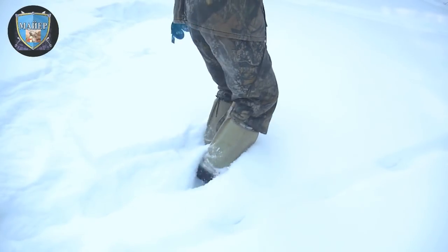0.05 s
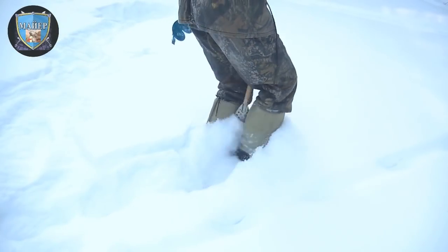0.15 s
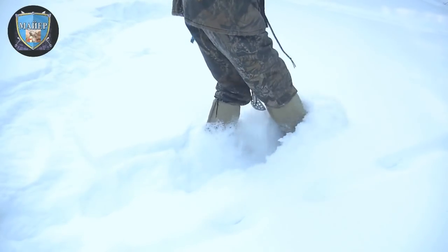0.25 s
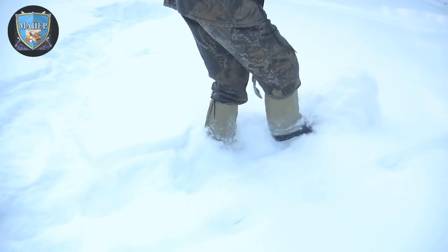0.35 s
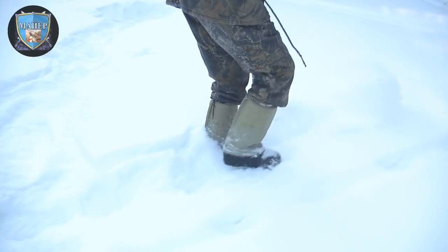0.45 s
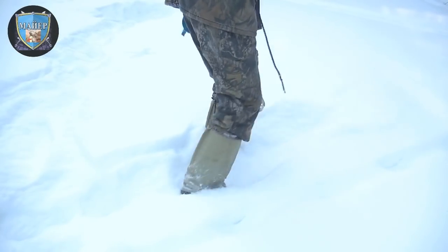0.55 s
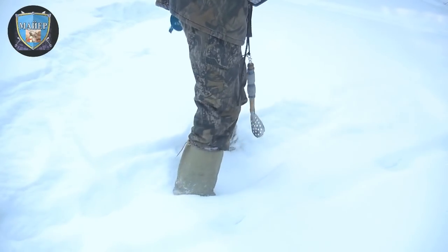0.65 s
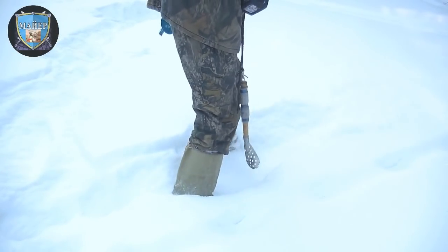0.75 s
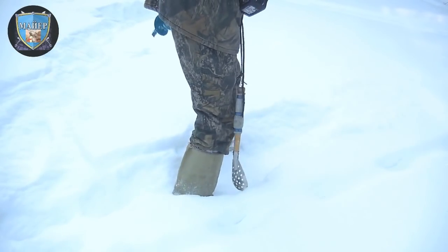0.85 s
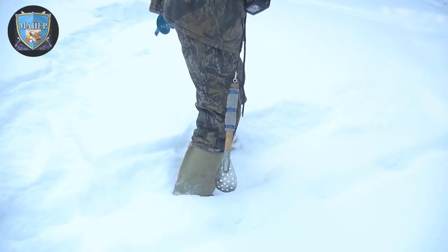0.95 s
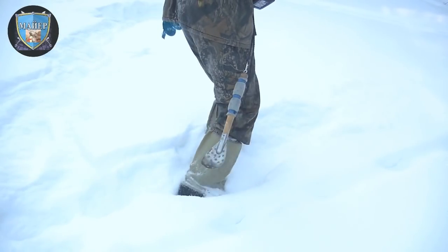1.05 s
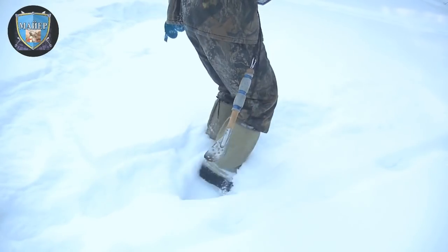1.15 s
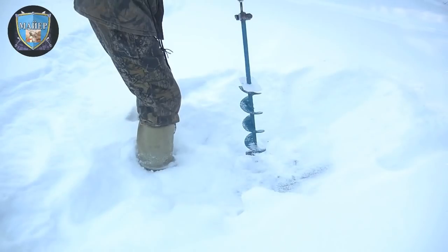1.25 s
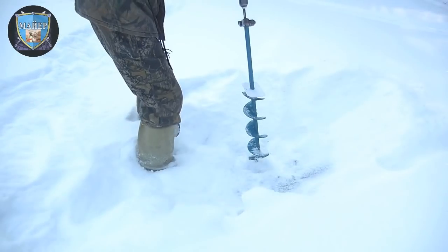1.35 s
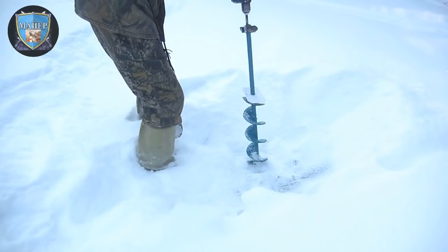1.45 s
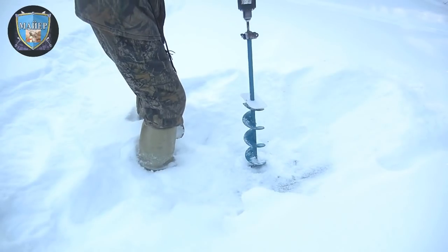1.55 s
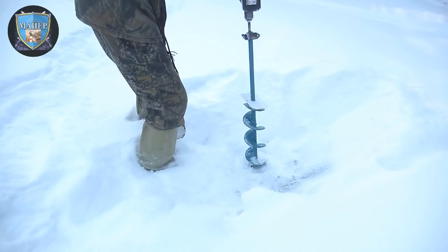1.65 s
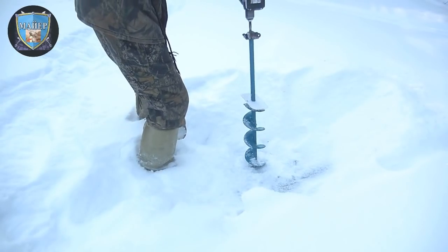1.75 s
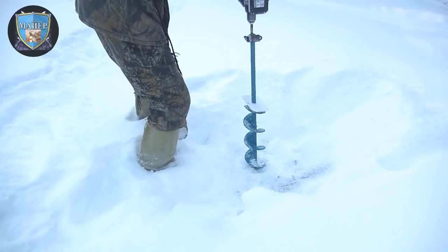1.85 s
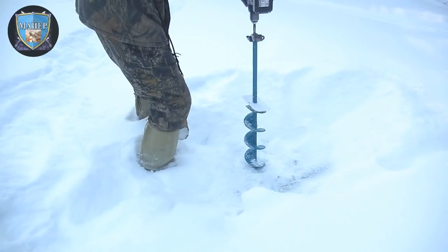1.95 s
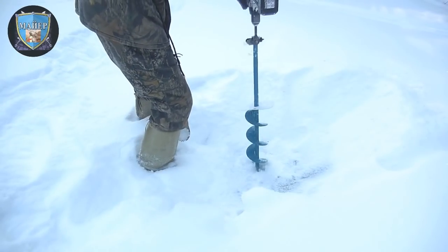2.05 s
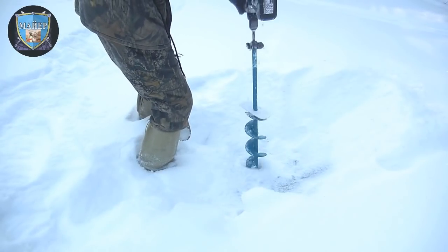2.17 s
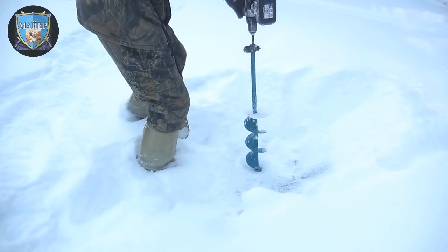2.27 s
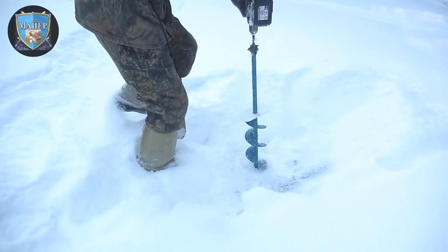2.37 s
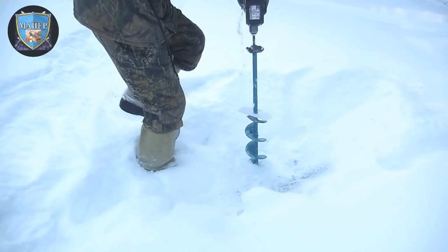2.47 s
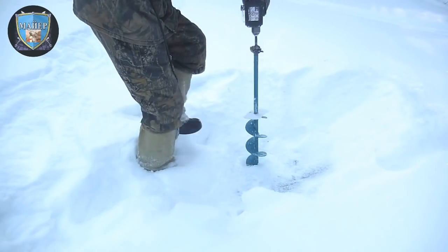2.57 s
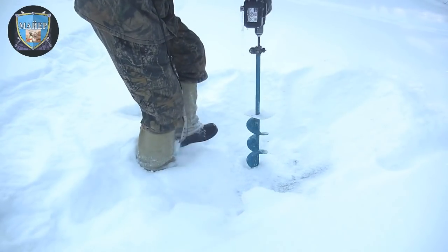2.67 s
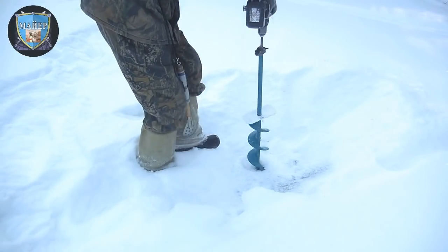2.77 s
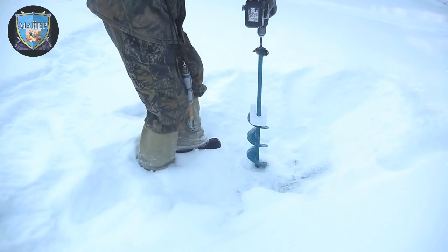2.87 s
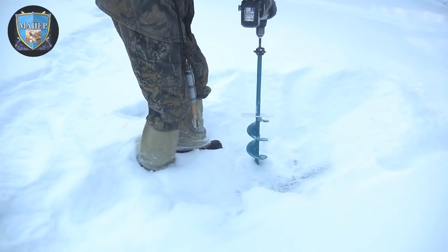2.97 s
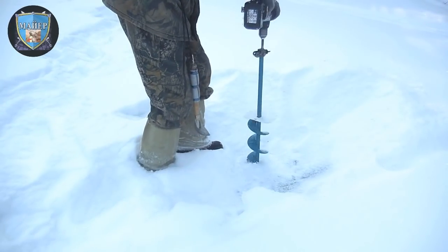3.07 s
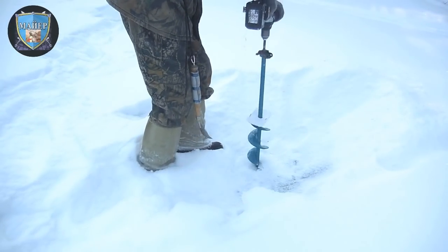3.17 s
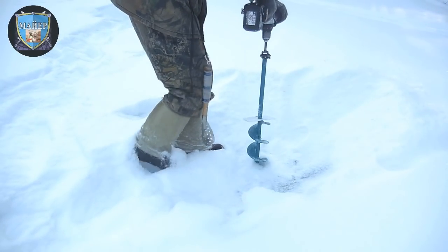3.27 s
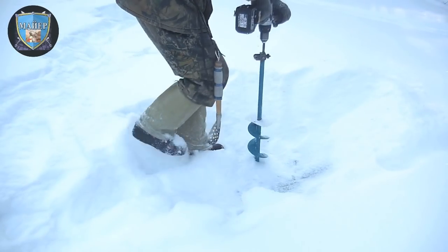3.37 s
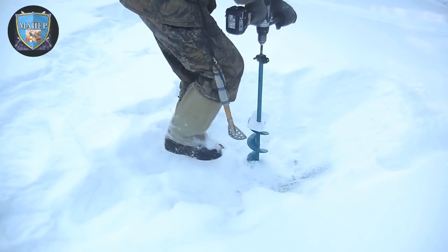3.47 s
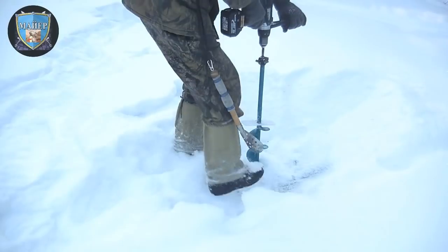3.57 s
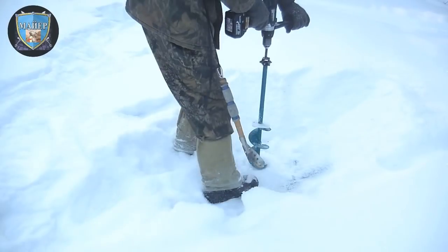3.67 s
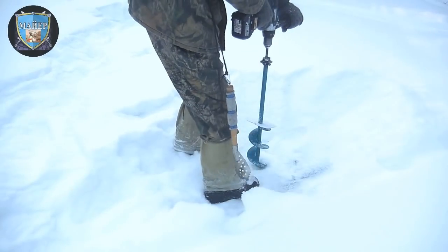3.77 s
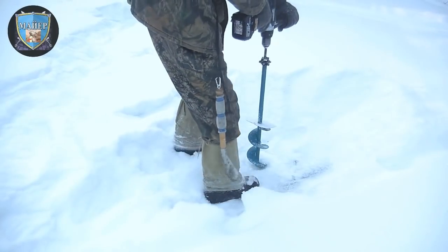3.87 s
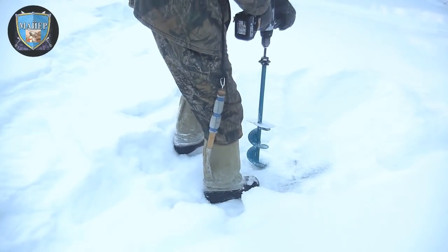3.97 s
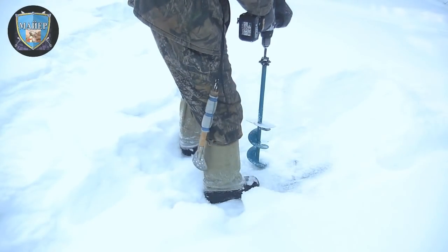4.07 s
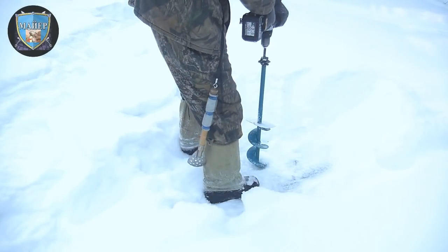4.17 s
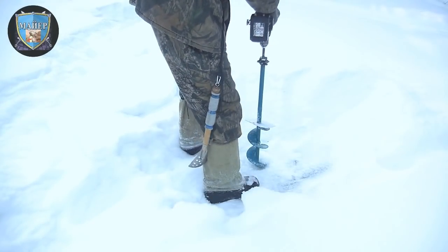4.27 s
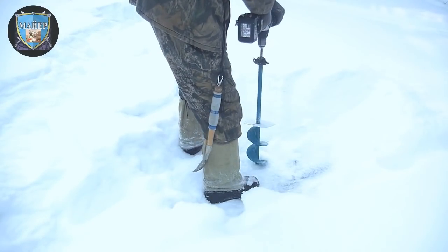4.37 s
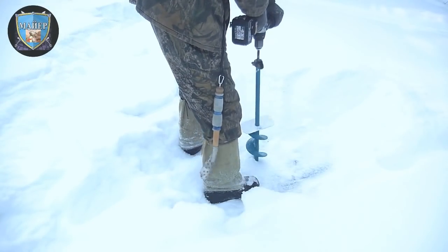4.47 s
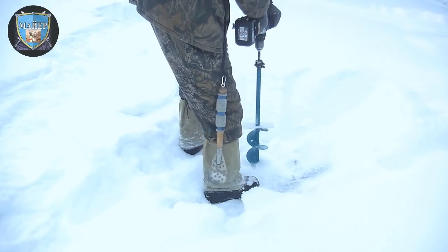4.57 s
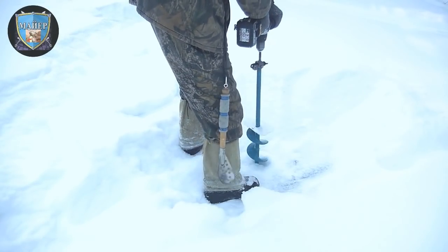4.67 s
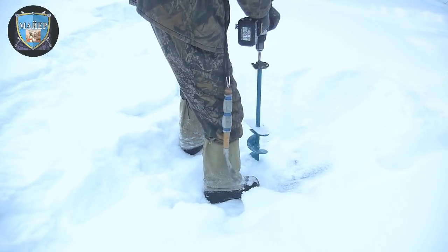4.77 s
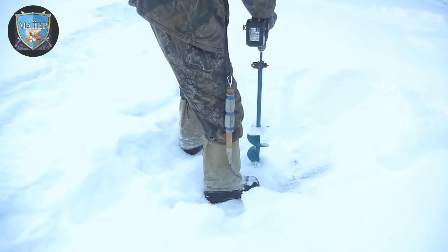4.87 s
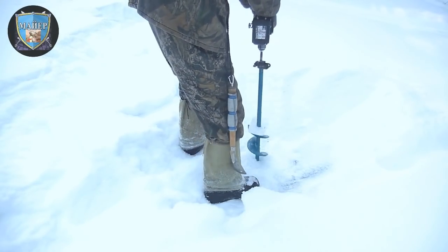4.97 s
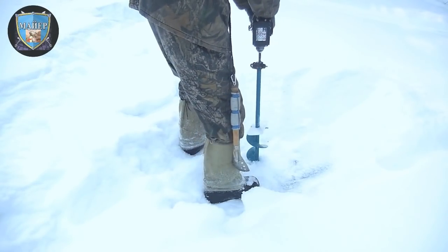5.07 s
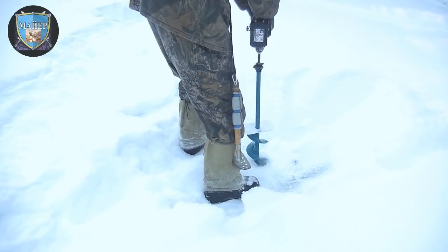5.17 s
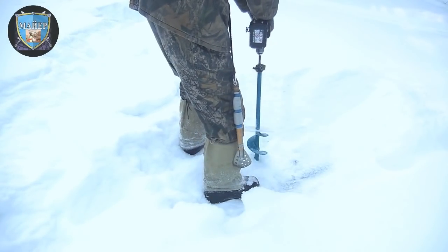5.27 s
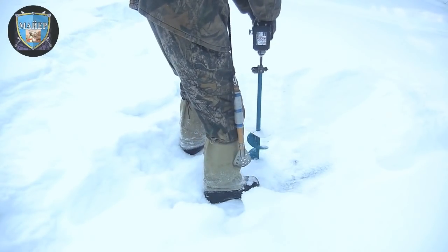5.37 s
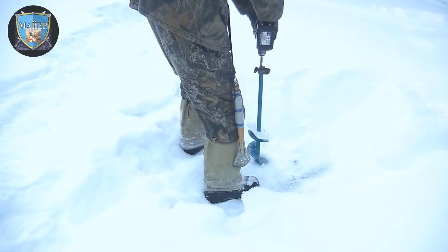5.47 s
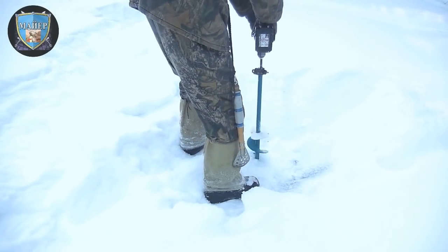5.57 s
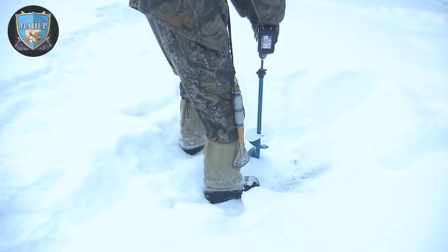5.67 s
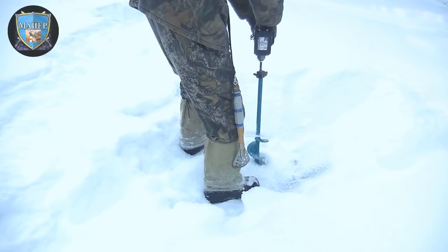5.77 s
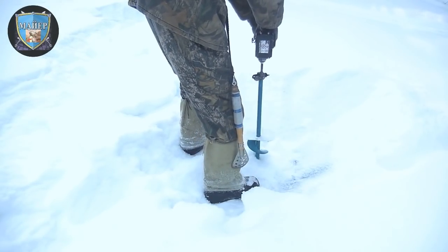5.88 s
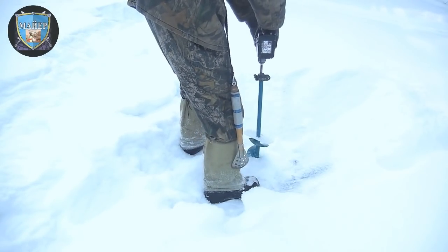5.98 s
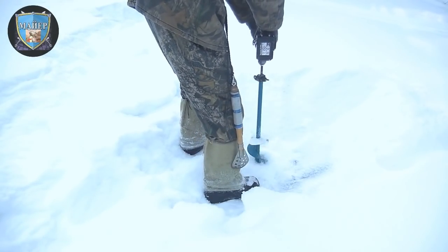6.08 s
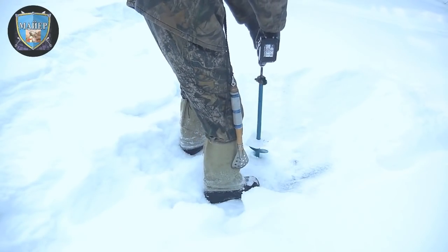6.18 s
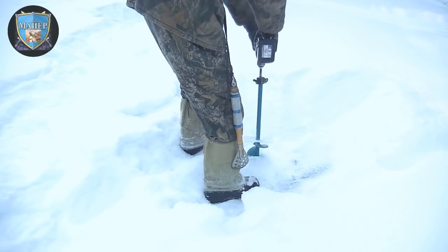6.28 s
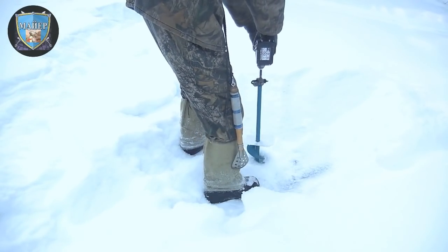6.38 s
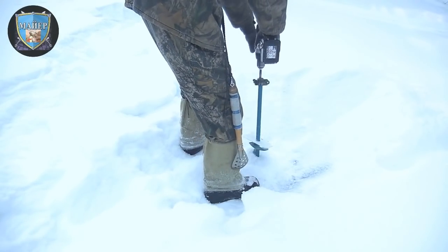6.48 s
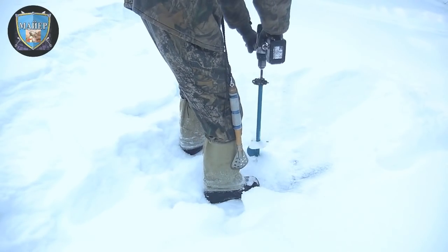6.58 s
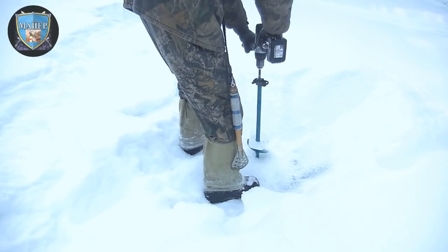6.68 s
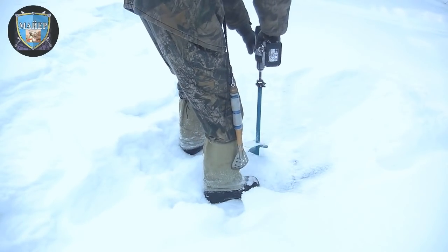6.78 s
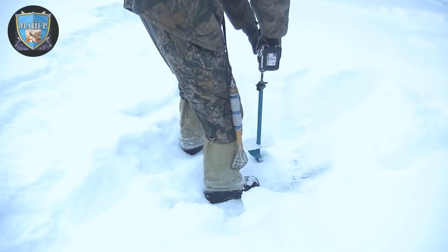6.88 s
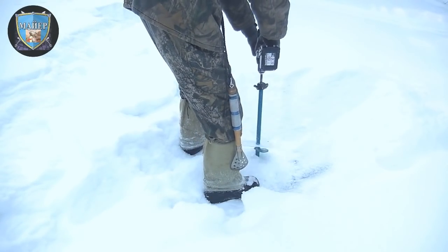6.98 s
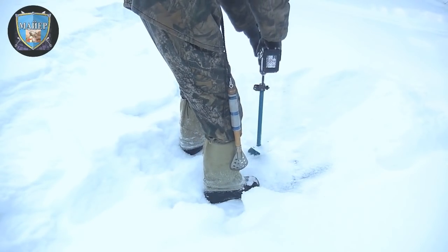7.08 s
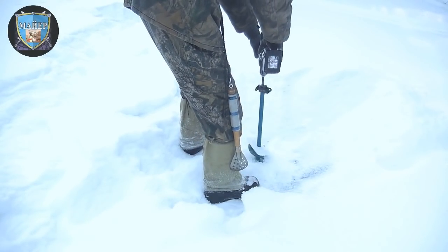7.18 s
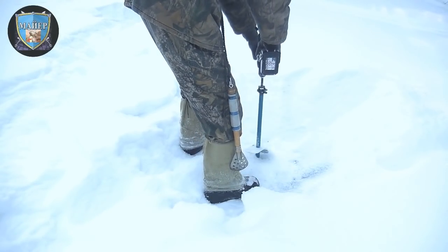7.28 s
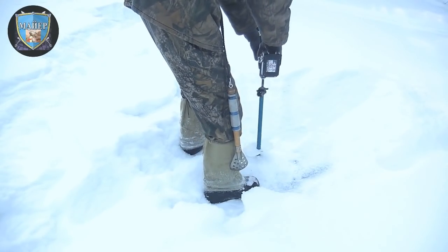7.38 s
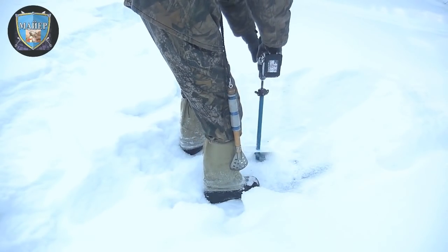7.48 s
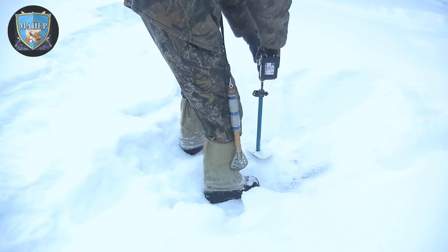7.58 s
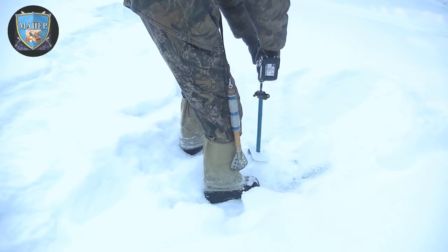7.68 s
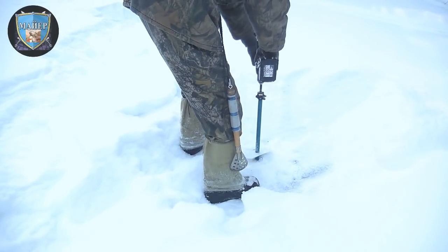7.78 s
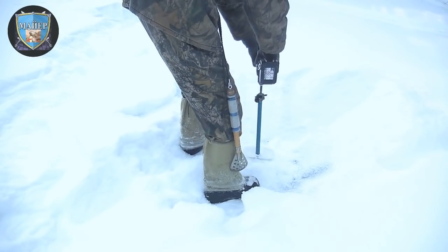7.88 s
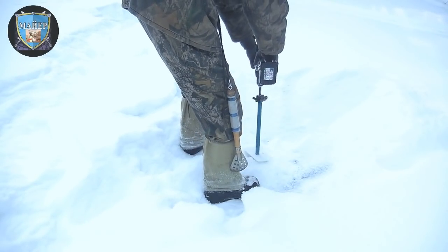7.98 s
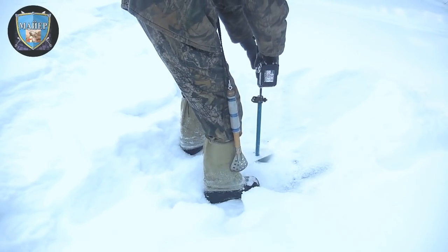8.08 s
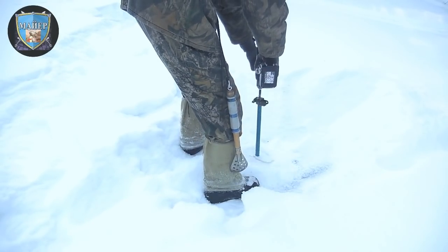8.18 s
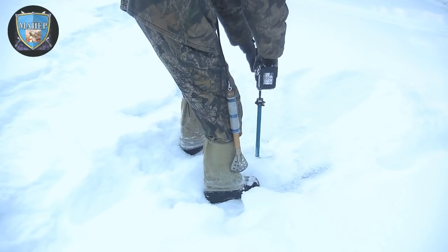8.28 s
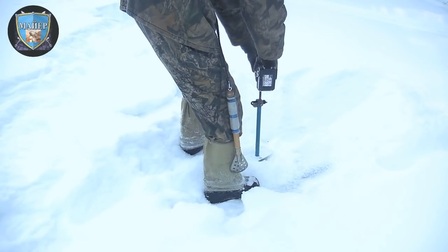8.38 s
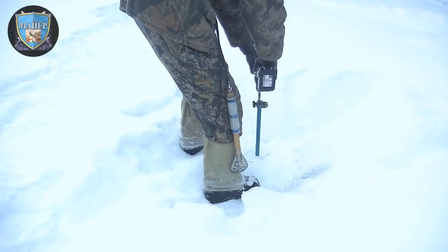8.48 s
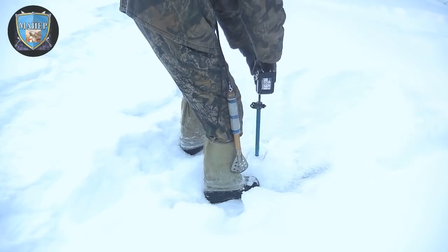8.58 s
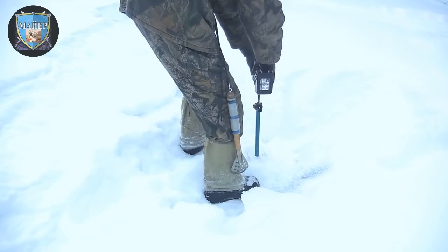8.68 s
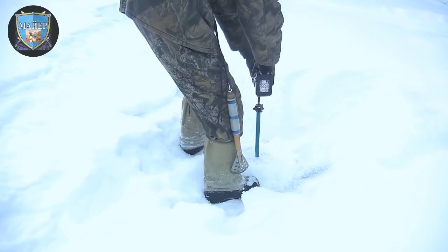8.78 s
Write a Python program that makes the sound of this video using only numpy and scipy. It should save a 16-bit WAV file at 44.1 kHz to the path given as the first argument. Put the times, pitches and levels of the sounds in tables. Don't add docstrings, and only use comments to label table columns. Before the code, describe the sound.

Outdoors on a quiet frozen lake, boots crunch and swish through dry snow with small clicks. A drill-driven auger starts with stuttering, squeaky bites, then settles into a loud ringing scrape. It stops; boots shift briefly and something taps. A longer run follows, rasping and hissing with ice chips, gears whining, growing duller and rumblier as the hole deepens. Heard in stereo from a few metres away, with faint hiss and little echo.

```python
import sys
import numpy as np
from scipy import signal
from scipy.fft import rfft, irfft, next_fast_len
from scipy.io import wavfile
from scipy.ndimage import uniform_filter1d

SR = 44100
rng = np.random.default_rng(int(sys.argv[2]) if len(sys.argv) > 2 else 0)


def decibels_to_gain(level_db):
    exponent = np.asarray(level_db, float) / 20
    return 10 ** exponent


def persist_wave(psi):
    counts = np.round(np.clip(psi, -1, 1) * 32767).astype(np.int16)
    wavfile.write(sys.argv[1], SR, np.atleast_2d(counts).T)


N = 389844
T = np.arange(N) / SR
COARSE = T[::32]
SIZE = next_fast_len(N + SR // 4)
HZ = np.maximum(np.arange(SIZE // 2 + 1) * SR / SIZE, 1)


def auger():
    # pitch in Hz, width in Hz, level in dB when free,
    # change in dB when buried.
    shaft_modes = [(625, 53, 1, -4), (827, 133, 12, -7), (710, 250, -22, 31.5), (1150, 320, 12.5, -17)]
    blade_modes = [(1596, 150, 4, -20), (1922, 210, 9, -10), (2173, 110, 0.5, 1), (2649, 510, -6, -8),
                   (3340, 600, 6.5, -5), (4310, 120, 2, -3)]
    # pitch in Hz, level in dB.
    scrape_colour = [(300, -92), (600, -10.5), (1200, -2), (2500, 1), (4000, -2.5), (6000, -7.5),
                     (9000, -16)]
    spray_colour = [(2500, -40), (4000, 4), (5000, 0.8), (6800, 4.5), (8500, 2), (11000, 0.5), (14000, -6),
                    (16000, -9.5)]
    rumble_colour = [(60, -57), (120, -19), (200, 1), (350, 7), (500, 4.5), (800, -27)]
    hole_colour = [(25, -30), (60, -14), (100, 3), (160, 0.5), (260, -10), (500, -22)]
    bite, depth, shaft_db, spray_db, rumble_db, squeal_hz, bend_db, squeal_db = blades_in_ice()

    gearbox_hz = 101.3 * (1 + 0.0186 * walk(4.8))
    stage = np.cos(2 * np.pi * np.cumsum(gearbox_hz) / SR)
    chatter = decibels_to_gain(0.7 * stage + 0.7 * walk(45) + 0.7 * walk(130))
    coarse_db = 2.9 - 1.3 * depth
    chips = grains(per_s=2500, spread_db=2.0, bed=1.08) * chatter

    blades = decibels_to_gain(-10) * steel(chips, blade_modes, depth, patchy_db=3.4, rate=22)
    squeal_level = decibels_to_gain(-5.5 + squeal_db - 6.7 * depth + 2.3 * walk(22))
    squeal_pitch = squeal_hz * (1 + 0.025 * walk(9))
    squeal = squeal_level * whistle(squeal_pitch, blur_hz=260.1, clean=0.05) * chatter
    scrape = decibels_to_gain(0.5) * clumps(colour(chips, scrape_colour), coarse_db)

    bend = unit(ring_twice(chips, 616, 84))
    shaft = steel(chips, shaft_modes, depth, patchy_db=1.3, rate=13) + decibels_to_gain(bend_db) * bend
    flying = grains(per_s=5500, spread_db=2.5, bed=0.41) * chatter
    spray = clumps(colour(flying, spray_colour), 1.23 * coarse_db)

    boom = decibels_to_gain(-23 + 28.8 * depth) * colour(rng.standard_normal(N), hole_colour)
    rumble = decibels_to_gain(1.8 * walk(6.3)) * (colour(rng.standard_normal(N), rumble_colour) + boom)
    return bite * (blades + squeal + scrape + decibels_to_gain(shaft_db) * shaft
                   + decibels_to_gain(spray_db) * spray + decibels_to_gain(rumble_db) * rumble)


def blades_in_ice():
    # time in seconds, depth from 0 to about 1.
    buried = [(2.0, 0.04), (3.0, 0.15), (3.7, 0.22), (4.4, 0.01), (5.2, 0.43), (5.7, 0.51), (6.5, 0.68),
              (7.6, 0.83), (8.84, 1.05)]
    # on in seconds, off in seconds, hole rumble in dB relative to the bite,
    # squeal in Hz, shaft bending in dB relative to its ring.
    pulls = [
        (2.03, 3.655, -35.5, 1879, -14),
        (4.41, 9.007, -30.5, 2344, -23),
    ]
    # time in seconds, bite in dB, seating of the tip in dB
    weight_on_drill = [
        [(2.0, -35.5, -18.5), (2.33, -32.5, -10.5), (2.5, -28, -3), (2.9, -25.5, 3), (3.0, -21.5, -1.5),
         (3.35, -22, 2), (3.66, -23.5, 2.5)],
        [(4.4, -24.5, -5.5), (4.7, -21, 0.5), (4.93, -24.5, -5), (5.25, -23, 3.5), (5.9, -24, 4),
         (6.5, -25.5, 1.5), (7.1, -25.5, 4.5), (8.0, -29, 3.5), (8.84, -29, 1)],
    ]
    # time in seconds, bite change in dB, build-up in seconds,
    # fading in seconds, squeal shift in Hz.
    catches = [(2.045, 6, 0.024, 0.022, 1000.5), (2.14, 5, 0.013, 0.017, 1001.5),
               (2.184, 7.5, 0.014, 0.013, -200), (2.217, 9, 0.0057, 0.0063, 1),
               (2.315, 3, 0.015, 0.016, 599), (2.35, -8, 0.016, 0.0091, 601), (2.38, 10.5, 0.023, .03, 900),
               (2.44, 7, 0.027, 0.024, 1), (2.49, -5, .03, 0.021, -1), (2.57, 2.5, 0.047, 0.037, -51),
               (3.02, 1.5, 0.072, .06, 10), (3.101, -1, 0.033, 0.016, -0.5), (3.42, 1, .06, .05, 499.5),
               (3.61, 4, .04, .03, 300), (4.503, 3.5, .03, 0.02, 60), (4.591, 0.5, 0.028, .03, 199.5),
               (4.87, -1, .035, 0.053, 0.5), (4.97, -0.5, .06, .045, 200), (5.09, -5.5, 0.067, 0.08, 349),
               (5.24, 0, 0.028, .03, -200), (5.82, 1, .05, .03, 51), (6.67, -11, 0.093, .13, 300),
               (6.93, -2.5, .05, .06, 300), (7.06, 0.5, .04, .05, -100)]

    s, bite_db, seat_db = np.vstack(weight_on_drill).T
    bite_db, seat_db = np.interp(T, s, bite_db), np.interp(T, s, seat_db)
    depth = np.interp(T, *np.transpose(buried))
    bumps = []
    for at, _, build_s, fade_s, _ in catches:
        late = COARSE - at
        bumps.append(decibels_to_gain(-8.7 * (late / np.where(late < 0, build_s, fade_s)) ** 2))
    catch_db, shift_hz = map(fine, np.array(catches)[:, [1, 4]].T @ np.array(bumps))

    spin_up_s, brake_s = 0.042, 0.026
    spin = sum(swell(on, spin_up_s, 1e6, power=1.1) * swell(off, 1e6, brake_s, power=1.7)
               for on, off, *_ in pulls)
    bite = fine(spin) * decibels_to_gain(bite_db + catch_db)

    between_s = (pulls[0][1] + pulls[1][0]) / 2
    on_s, _, hole_db, pull_squeal_hz, pull_bend_db = np.array(pulls)[1 * (T > between_s)].T
    shaft_db = -11 + seat_db + 0.49 * catch_db
    spray_db = -2 - 0.41 * seat_db - 0.73 * catch_db
    rumble_db = hole_db + 0.59 * seat_db + 0.96 * catch_db + 9.5 * depth
    squeal_hz = pull_squeal_hz + 30 * (T - on_s) + shift_hz
    bend_db = pull_bend_db + 0.6 * seat_db
    squeal_db = 0.23 * catch_db
    return bite, depth, shaft_db, spray_db, rumble_db, squeal_hz, bend_db, squeal_db


def cracks():
    bite, depth, *_ = blades_in_ice()
    snaps = grains(per_s=70, spread_db=2.5, bed=0)
    return bite * decibels_to_gain(-11.5 - 2 * depth) * unit(ring(snaps, 2500, 3500) + ring(snaps, 6300, 7000))


def gears():
    # time in seconds, pitch in Hz.
    mesh = [(4.4, 7600), (6.45, 7670), (6.58, 8000), (6.68, 8450), (6.78, 8370), (6.88, 7900), (6.95, 8050),
            (7.02, 7710), (8.84, 7640)]
    # multiple of the pinion mesh, level in dB, blur in Hz, dB change per 10% of overspeed.
    gear_tones = [(.3185, 6, 30, -7), (.637, -5, 90, -3), (1.0, 2, 70, 0)]
    # multiple of the pinion mesh, level in dB, blur in Hz.
    planets = [(.679, 3.5, 190), (1.257, 1.5, 190)]
    # time in seconds, gear level in dB.
    facing = [(4.4, -49), (5.2, -46), (5.9, -47), (6.5, -43), (6.9, -41), (7.05, -43), (8.84, -43.5)]
    speed_hz = np.interp(T, *np.transpose(mesh)) * (1 + 0.0045 * walk(18))
    loaded_hz, loaded_s = 7670, 7.0
    overspeed = 10 * (speed_hz / loaded_hz - 1)
    tones = sum(decibels_to_gain(db + race_db * overspeed) * whistle(k * speed_hz, blur, clean=0.98)
                for k, db, blur, race_db in gear_tones)
    buzz = sum(decibels_to_gain(db) * whistle(k * speed_hz, blur, clean=0.13) for k, db, blur in planets)
    load_db = -4 + 6 * np.clip((T - loaded_s) / 0.086 + 1, 0, 1)
    return (tones + decibels_to_gain(load_db) * buzz) * decibels_to_gain(np.interp(T, *np.transpose(facing), left=-120))


def boots():
    # peak in seconds, crunch in dB, rise in seconds, fall in seconds for 20 dB,
    # powder hiss in dB relative to the crunch.
    steps = [(.0, -54, .1, .25, -14), (.14, -47, .12, .2, -7), (.245, -40.5, .17, .085, 0),
             (.34, -66, .1, .5, 13), (.635, -44.5, .055, .25, -4), (.762, -43, .15, .04, -10),
             (.836, -52, .007, .06, -1), (.908, -59, .14, .016, 11), (1.09, -54, .06, .2, -11),
             (1.228, -43, .19, .052, -1), (1.518, -56, .022, .12, 12), (1.576, -48, .06, .065, 8),
             (1.627, -53, .06, .04, 7), (1.776, -67, .02, .03, 15), (1.822, -54, .045, .085, 5),
             (1.918, -46, .06, .045, 5), (2.0, -56, .018, .03, -9), (3.716, -44, .035, .04, -5),
             (3.79, -47, .1, .024, -9), (3.84, -64, .05, .1, -6), (3.958, -63, .012, .07, -10),
             (4.17, -60, .24, .28, 0), (4.336, -44, .044, .02, -12)]
    # pitch in Hz, level in dB.
    crunch_colour = [(150, -21), (400, -13), (900, -2.5), (2000, -0.5), (4000, -2), (6000, -10.5),
                     (9000, -17)]
    powder_colour = [(3000, -18), (5500, 0.5), (8000, 2), (12000, 0.5), (16000, -3.5)]
    weight = np.array([decibels_to_gain(db) * swell(s, rise, fall, power=1.6) for s, db, rise, fall, _ in steps]) ** 2
    powder_db = np.array(steps)[:, 4]

    def level(extra_db):
        return fine(np.sqrt(decibels_to_gain(2 * extra_db) @ weight))

    crush = grains(per_s=3500, spread_db=4.0, bed=1.0) * decibels_to_gain(1.9 * walk(45.9))
    powder = grains(per_s=15000, spread_db=6.5, bed=0.6) * decibels_to_gain(1.1 * walk(35.18))
    crush = clumps(colour(crush, crunch_colour), patchy_db=1.5)
    low = shape(crush, 1 / (1 + (HZ / 605) ** 4))
    crunch = level(0 * powder_db) * (crush - low)
    dull = level(-0.64 * (powder_db - 1)) * low
    return crunch + dull + level(powder_db) * colour(powder, powder_colour)


def ticks():
    # time in seconds, peak in dB, ring in Hz, treble in dB relative to the ring, ring time in seconds.
    taps = [(0.064, -30, 2500, -12, 0.022), (0.83, -31, 1170, -8, 0.024), (0.84, -33, 1860, 4, 0.032),
            (0.862, -39, 1620, -14, 0.031), (1.505, -44, 3270, -14, 0.026),
            (1.569, -32.5, 3240, -10, 0.049), (1.685, -62, 1210, -12, 0.035),
            (1.776, -51, 1890, -12, 0.035), (1.91, -32, 4110, -17.5, 0.035), (1.992, -41, 1470, -18, 0.049),
            (2.011, -22, 3060, -3, 0.038), (2.372, -14, 2800, -18, 0.056), (2.793, -17, 1650, 0, 0.035),
            (3.747, -28, 3470, -10, 0.022), (3.884, -51, 1330, -4, 0.035), (3.951, -36, 1000, -24, 0.03),
            (4.129, -56, 1660, -12, 0.035), (4.174, -44, 2750, 4, 0.035), (4.35, -14.5, 3120, -9, 0.023),
            (4.377, -16, 1570, -17, 0.038), (4.388, -21, 1160, -10, 0.026)]
    out, t = np.zeros(N + SR), T[:SR // 8]
    for s, db, hz, treble_db, t60 in taps:
        fading = np.exp(-np.log(1000) * t / np.clip(t60, 0.004, 0.2))
        burst = rng.standard_normal((2, len(t))) * fading
        body = ring_twice(burst[0], hz, 1.3 * hz)
        crack = ring(burst[1], 5700, 11000)
        sound = body / abs(body).max() + decibels_to_gain(treble_db) * crack / abs(crack).max()
        out[int((s + 0.0012) * SR):][:len(t)] += decibels_to_gain(db) * sound
    return out[:N]


def air():
    # pitch in Hz, level in dB.
    hiss_colour = [(35, -16), (130, -16), (400, -2.5), (900, -2), (2300, -0.5), (6000, -4.5), (11000, -6.5),
                   (16000, -10)]
    # pitch in Hz, level in dB.
    wind_colour = [(20, 0), (60, -7), (150, -4), (250, -13), (500, -35)]
    # time in seconds, level in dB, length in seconds.
    puffs = [(.02, -80, 0.035), (.175, -73, .04), (.35, -70, .02), (.392, -59, 0.023), (0.52, -62, 0.019),
             (0.582, -66, 0.028), (.68, -75, 0.17), (.81, -75, 0.046), (.97, -69, .03), (1.205, -77, .06),
             (3.705, -69, 0.24)]
    opposite = np.array([[1], [-1]])
    mid, side = (colour(rng.standard_normal(N), hiss_colour) for _ in range(2))
    hiss = decibels_to_gain(-60) * (mid + 0.88 * side * opposite)
    mid, side = (colour(rng.standard_normal(N), wind_colour) for _ in range(2))
    gust = sum(decibels_to_gain(db) * swell(s, length, length, power=1.4) for s, db, length in puffs)
    return hiss + fine(gust) * (mid + 0.55 * side * opposite)


def ports(x):
    # pitch in Hz, left minus right in dB.
    port_db = [(60, 5), (130, -1), (700, 1.0), (1290, 1.5), (2380, -1.0), (4400, -6.5), (8120, 0.5),
               (15000, -7)]
    # pitch in Hz, lead of the left in radians.
    port_phase = [ (0, 1), (3100, -0.51), (3790, -1.2), (4480, -0.74), (6630, -1.1), (8270, -0.83),
                  (12500, -1.44), (16500, -0.094)]
    # pitch in Hz, share in dB.
    scatter_share = [(60, -47), (500, -61), (1400, -12.5), (3100, -8), (6800, -50), (12000, -10),
                     (16000, -2)]
    # pitch in Hz, level in dB.
    low_cut = [(20, -30), (50, -24), (90, -18), (150, -5.5), (300, 0.53)]
    smear = signal.chirp(T[:SR // 100], 0, 0.01, SR / 2)
    smear_phase = np.exp(1j * np.angle(rfft(smear, SIZE)))
    spread = signal.hilbert(shape(x, smear_phase * decibels_to_gain(along(scatter_share))))
    scattered = np.real(spread * np.exp(1j * np.cumsum(walk(300)) * 900 / SR))
    half = decibels_to_gain(along(port_db) / 2) * np.exp(0.5j * along(port_phase))
    return shape(np.array([x + scattered, x - scattered]), np.array([half, 1 / half]) * decibels_to_gain(along(low_cut)))


def grains(per_s, spread_db, bed):
    hit = rng.random(N) < per_s / SR
    size = decibels_to_gain(spread_db * np.minimum(rng.exponential(size=N), 4.2)) * rng.choice([-1, 1], N)
    return unit(unit(hit * size) + bed * rng.standard_normal(N))


def steel(chips, modes, depth, patchy_db, rate):
    total = 0
    for hz, width, db, buried_db in modes:
        level = decibels_to_gain(db + buried_db * depth + patchy_db * walk(rate))
        total = total + level * unit(ring_twice(chips, hz, 1.68 * width))
    return unit(total)


def clumps(x, patchy_db):
    _, s, cells = signal.stft(x, SR, nperseg=512)
    field = rng.standard_normal(cells.shape)
    field = unit(uniform_filter1d(uniform_filter1d(field, size=3, axis=0), size=5, axis=1))
    peaks = decibels_to_gain(np.interp(s, T, patchy_db + 0 * T) * (field + 0.12 * field ** 2))
    peaks = peaks / np.sqrt(np.mean(peaks ** 2, axis=0))
    return unit(signal.istft(cells * peaks, SR, nperseg=512)[1][:N])


def whistle(hz, blur_hz, clean):
    angle = 2 * np.pi * np.cumsum(hz) / SR
    return unit((clean + walk(2 * blur_hz)) * np.cos(angle) + walk(2 * blur_hz) * np.sin(angle))


def swell(peak_s, rise_s, fall_s, power):
    late = COARSE - peak_s
    length = np.where(late < 0, max(rise_s, 0.002), max(fall_s, 0.002))
    return decibels_to_gain(-20 * np.minimum(abs(late / length) ** power, 8))


def fine(control):
    return np.interp(T, COARSE, control)


def walk(rate):
    k = int(SR / rate)
    held = np.repeat(rng.standard_normal(N // 40)[:N // k + 1], k)
    return unit(uniform_filter1d(uniform_filter1d(held, k), k)[:N])


def ring(x, hz, width):
    return signal.lfilter(*signal.iirpeak(hz, hz / width, SR), x)


def ring_twice(x, hz, width):
    return ring(ring(x, hz, width), hz, width)


def unit(x):
    return x / np.sqrt(np.mean(x ** 2))


def along(points):
    hz, value = np.transpose(points)
    return np.interp(np.log(HZ), np.log(np.maximum(hz, 1)), value)


def shape(x, gain):
    return irfft(rfft(x, SIZE) * gain, SIZE)[..., :N]


def colour(x, points):
    return unit(shape(x, decibels_to_gain(along(points))))


def scene():
    return ports(auger() + gears() + boots() + ticks() + cracks()) + air()


def band_limit(x):
    return signal.sosfilt(signal.butter(12, 16960, fs=SR, output="sos"), x)


def record(dry):
    rounded = np.tanh(0.9 * dry) / 0.9
    top_cut = signal.ellip(12, 0.2, 70, 15740, fs=SR, output="sos")
    bass_cut = signal.butter(2, 40, "high", fs=SR, output="sos")
    mix = signal.sosfilt(bass_cut, signal.sosfilt(top_cut, rounded))
    return band_limit(mix)


dry = scene()
out = record(dry)
persist_wave(out)
```